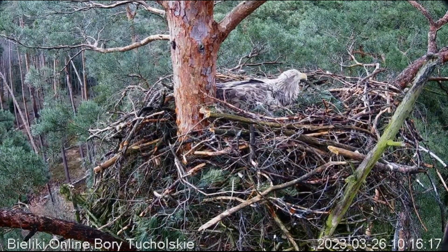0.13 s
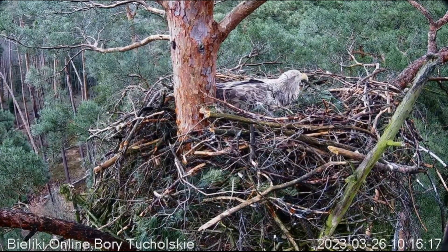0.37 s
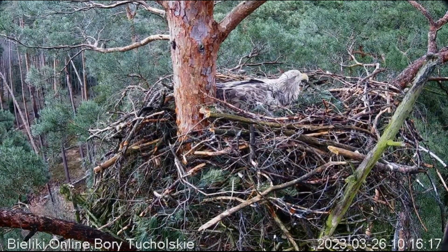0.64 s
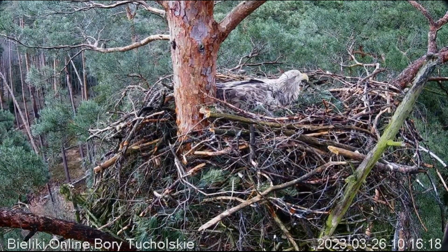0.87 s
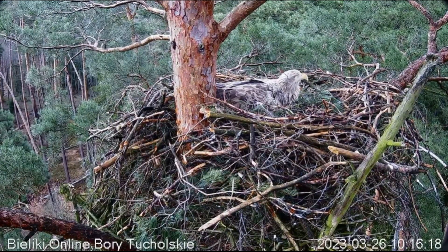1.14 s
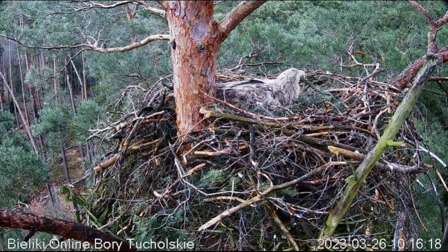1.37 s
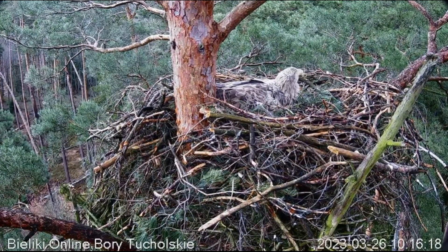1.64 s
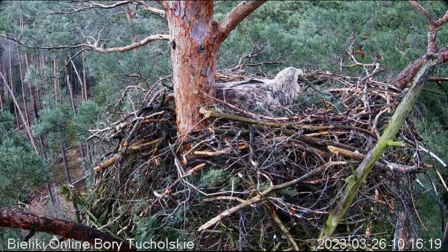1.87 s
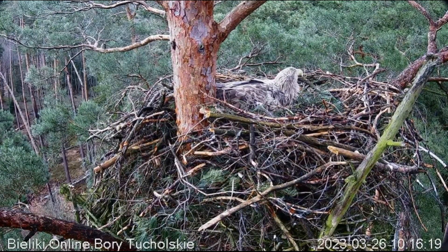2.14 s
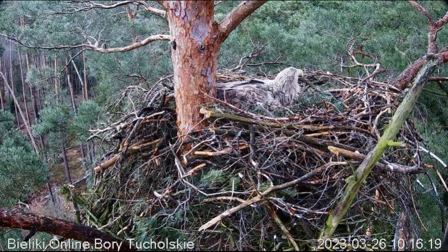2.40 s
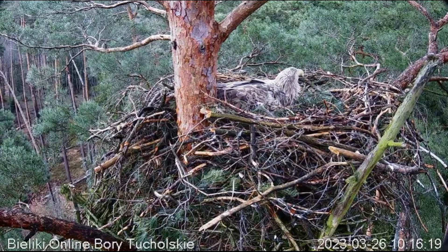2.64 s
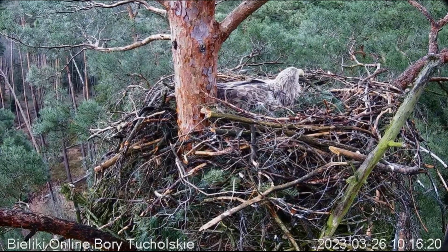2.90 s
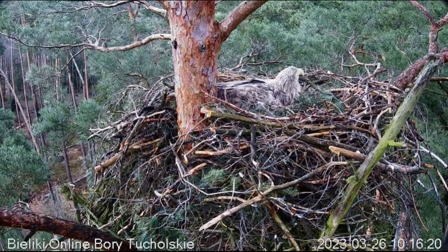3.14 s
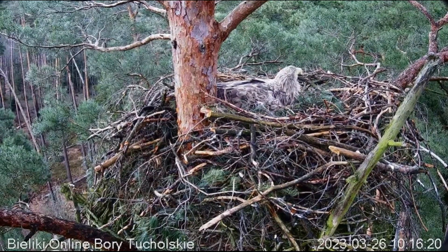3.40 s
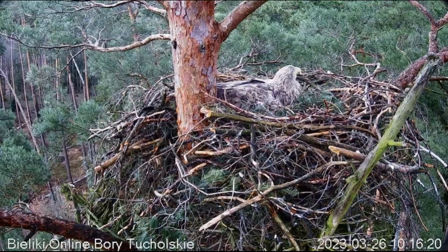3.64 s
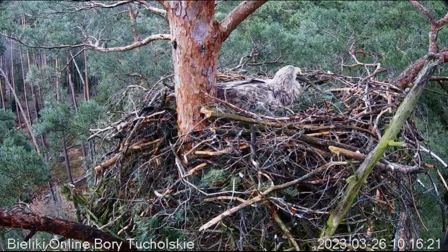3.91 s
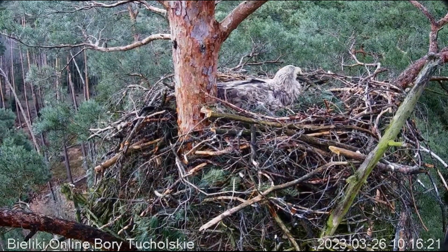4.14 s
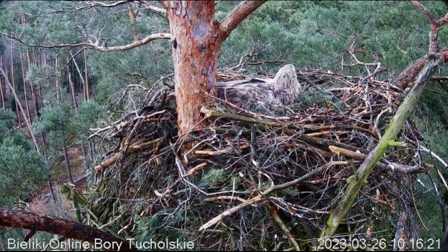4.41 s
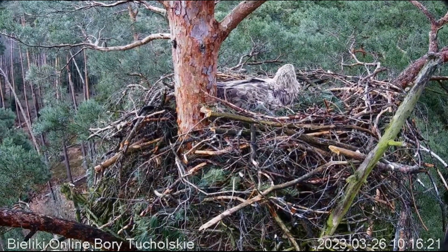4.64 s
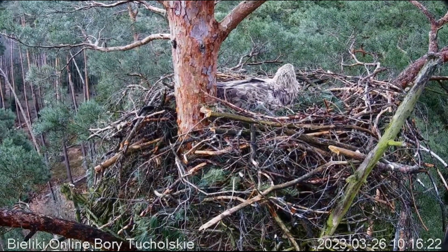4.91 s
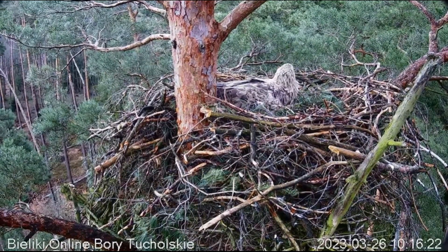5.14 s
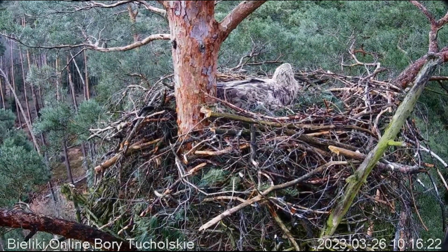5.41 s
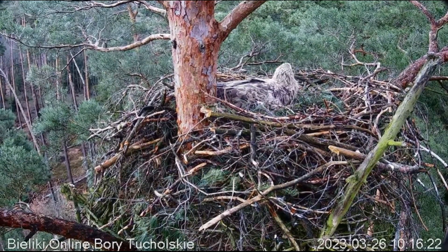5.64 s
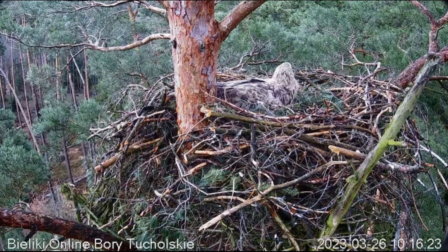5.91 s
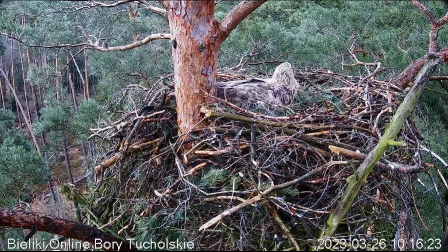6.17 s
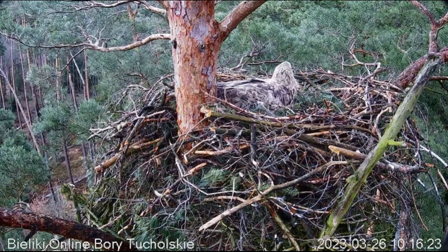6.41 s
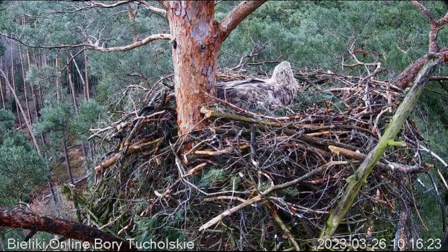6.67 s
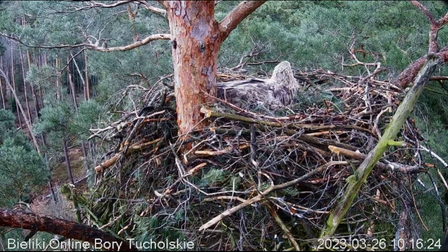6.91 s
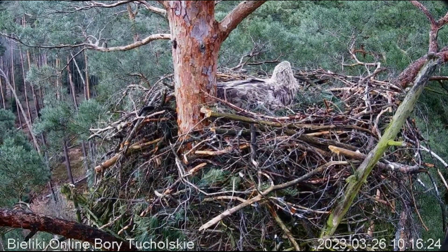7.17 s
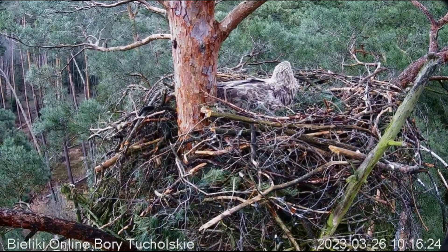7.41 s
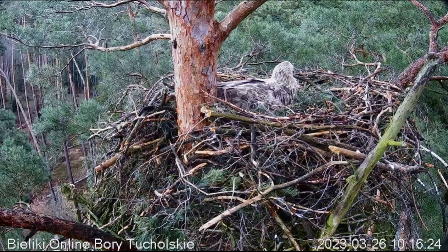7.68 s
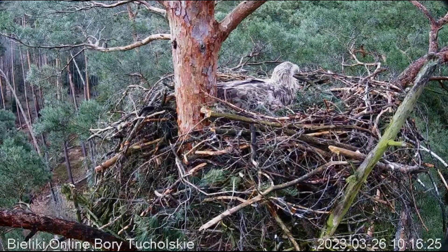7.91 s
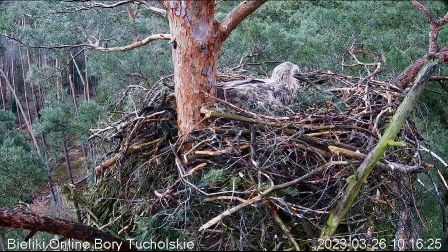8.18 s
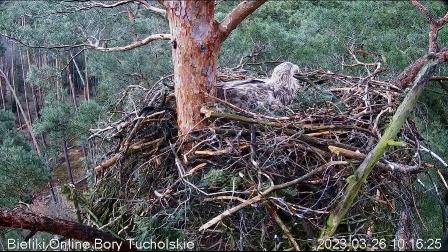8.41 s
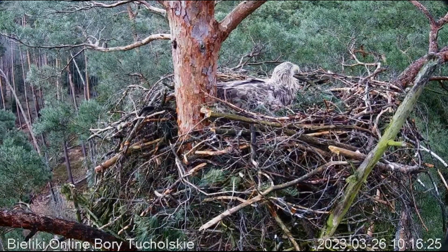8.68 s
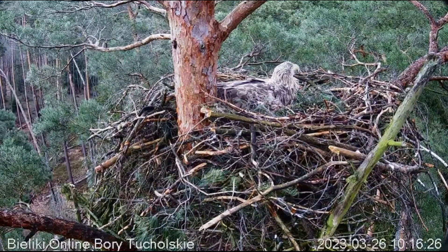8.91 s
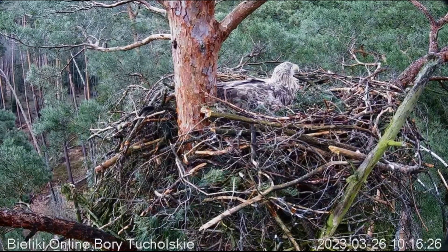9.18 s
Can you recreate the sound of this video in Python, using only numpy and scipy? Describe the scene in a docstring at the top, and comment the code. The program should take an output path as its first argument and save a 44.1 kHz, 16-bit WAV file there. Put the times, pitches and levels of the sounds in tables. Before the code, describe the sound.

A finch's falling phrases, a fluting thrush and a two-note tit ring through pines, with low wind buffeting early on.

```python
"""Songbirds in a pine forest at a small microphone high in a tree: a thrush flutes, a finch sings falling
phrases, a tit repeats two notes, thin seeps and pips come from further off. All are wavering, fluttering sines
on pitch tracks, echoed from the trunks by convolution with sparse noise. Wind gusts thump (one-cycle pulses)
and rumble (shaped noise) on the microphone, twigs crackle, the forest hums softly as flickering noise
and the electronics tick in the treble as short noise bursts."""
import sys
import numpy as np
from scipy import signal
from scipy.fft import rfft, irfft
from scipy.io import wavfile
from scipy.ndimage import uniform_filter1d

SR = 44100
rng = np.random.default_rng(int(sys.argv[2]) if len(sys.argv) > 2 else 0)


def log_audio(samples):
    """Write samples as a 16-bit WAV file to the path given in sys.argv[1]."""
    # one column per channel
    frames = np.atleast_2d(samples).T
    # limit to full scale, then quantise
    limited = np.clip(frames, -1, 1)
    pcm = np.round(limited * 32767).astype(np.int16)
    wavfile.write(sys.argv[1], SR, pcm)


def invert_db(level):
    """Linear amplitude ratio for a level in decibels (20 dB per decade), elementwise."""
    return 10 ** (np.asarray(level, dtype=float) / 20)


N = 410130
TIME = np.arange(N) / SR


def band(x, lo_hz, hi_hz):
    """Butterworth band-pass."""
    return signal.sosfilt(signal.butter(2, [lo_hz, hi_hz], "band", fs=SR, output="sos"), x)


def unit(x):
    """Scales to rms 1."""
    return x / np.sqrt(np.mean(x ** 2))


def coloured(points):
    """Noise with the given (Hz, relative dB) spectrum, rms 1."""
    hz, db = np.transpose(points)
    log_hz = np.log(np.fft.rfftfreq(N, 1 / SR) + 1)
    gain = invert_db(np.interp(log_hz, np.log(hz), db))
    return unit(irfft(rfft(rng.standard_normal(N)) * gain, N))


def walk(rate_hz):
    """Random levels held 1 / rate_hz s and slewed twice; spread near 1."""
    hold = int(SR / rate_hz)
    steps = np.repeat(rng.standard_normal(N // hold + 1), hold)
    return unit(uniform_filter1d(uniform_filter1d(steps, hold), hold)[:N])


def add(out, start_s, sound):
    """Mixes a sound into out; a start before 0 becomes 0."""
    i = max(int(start_s * SR), 0)
    out[i:i + len(sound)] += sound[:N - i]


def span(length_s):
    """Progress 0-1 through a note."""
    return np.linspace(0, 1, int(length_s * SR))


def glide(length_s, first_hz, last_hz, bend=1):
    """Pitch track from first to last; the larger the bend, the later it moves."""
    return first_hz + (last_hz - first_hz) * span(length_s) ** bend


def ticks():
    """Electronics: soft noise bursts every 20 ms that slide upward in pitch, in a pattern of five."""
    # Each entry: level of one tick in dB over the swell curve, before random spread.
    tick_db = [3, 12, 12, 5.5, 12]
    start_s, step_s, length_s = .0035, .02, .0135
    first_hz, last_hz = 5900, 6800
    slot, t = np.divmod(TIME - start_s, step_s)
    slot = slot.astype(int)
    u = t / length_s
    size, shift = rng.standard_normal((slot.max() + 2, 2))[slot].T
    gate = np.sin(np.pi * np.clip(u, 0, 1) ** .6)
    hz = first_hz + (last_hz - first_hz) * u + 120 * shift
    fuzz = unit(band(band(rng.standard_normal(N), 20, 450), 20, 450))
    pattern_db = np.array(tick_db)[slot % len(tick_db)] + 1.8 * size
    return invert_db(pattern_db) * gate * fuzz * np.sin(2 * np.pi * np.cumsum(hz) / SR)


def background():
    """Far wind in the crowns and microphone hiss, each third-octave band flickering alone, plus ticks."""
    # Common swell. Each row: time in seconds, level in dB.
    swell = [(0, -85.5), (3.1, -84.5), (4.4, -85.5), (5.02, -89.5), (5.96, -86), (8.18, -89), (8.29, -86.5),
             (9.3, -85.5)]
    # Forest spectrum. Each row: frequency in Hz, relative density in dB per Hz.
    forest = [(32, -25), (55, -10), (80, -10), (201, -9.5), (493, -3), (596, -1.5), (737, 1.5),
              (1050, -11.5), (1430, -17), (4750, -22.5), (5470, -21.5), (6150, -15.5), (7610, -19.5),
              (12800, -26), (14400, -27.5), (15400, -51)]
    air_db = 16  # over the swell
    spectrum = rfft(coloured(forest))
    octave = np.log2(np.fft.rfftfreq(N, 1 / SR) + 1)
    together_db = .5 * walk(35)  # shared by all bands
    air = 0
    for centre in np.arange(5, 15, 1 / 3):
        share = np.clip(1 - 3 * np.abs(octave - centre), 0, 1)
        flicker_db = together_db + 1.4 * walk(25) + 2.3 * walk(60)
        air = air + irfft(spectrum * share, N) * invert_db(flicker_db)
    swell_db = np.interp(TIME, *np.transpose(swell))
    return invert_db(swell_db) * (invert_db(air_db) * air + ticks())


def wind():
    """Eddies push the membrane: one-cycle thumps, each with a burst of flapping, over lumpy turbulence."""
    # Strongest eddies. Each row: time in seconds, frequency in Hz, peak in dB.
    thumps = [(.033, 82, -43), (0.168, 78, -39), (0.218, 130, -36), (0.238, 200, -33.5), (0.677, 33, -38),
              (.762, 70, -36), (.82, 40, -41), (.953, 110, -37), (1.185, 40, -44), (1.263, 23, -40.5),
              (1.337, 43, -41.5), (1.382, 60, -40.5), (1.822, 22, -34.5), (1.893, 37, -36),
              (1.911, 48, -30.5), (2.058, 42, -39), (2.209, 33, -41.5), (2.482, 22.6, -36), (2.59, 21, -37),
              (2.663, 34, -36.5), (2.849, 65, -48), (2.905, 55, -45.5), (2.966, 45, -38), (3.0, 52, -32),
              (3.067, 18, -35), (3.116, 15.4, -25.5), (3.191, 24, -38.5), (3.326, 41, -32.5),
              (3.373, 28, -36.5), (3.591, 30, -31), (3.628, 19, -25.5), (3.675, 23, -30.5),
              (3.714, 116, -27.5), (3.746, 66, -30.5), (3.809, 21, -36), (3.867, 49, -35),
              (3.938, 113, -24.5), (3.952, 120, -33.5), (3.991, 109, -27.5), (4.019, 76, -34),
              (4.063, 66, -29.5), (4.083, 98, -29.5), (4.113, 46, -34.5), (4.179, 88, -25.5),
              (4.191, 83, -21.5), (4.25, 102, -27), (4.268, 85, -35.5), (4.295, 87, -35), (4.324, 82, -32),
              (4.507, 77, -35)]
    # Turbulence. Each row: time in seconds, rumble level in dB, brightness (sets the flapping) in dB.
    gust = [(0, -53.5, -16.5), (.23, -46.5, 0.5), (.39, -58.5, -0.5), (1.6, -51.5, -8.5), (2.2, -56.5, -15),
            (2.72, -60.5, -9.5), (3.03, -55.5, -10), (3.55, -57.5, -10.5), (3.96, -57, -4.5),
            (4.25, -49.5, 1), (4.45, -49.5, -13.5), (4.74, -66.5, -12), (5.7, -67.5, -6.5),
            (6.7, -72, -10.5), (7.0, -76, -12), (7.9, -78, -4), (8.3, -64, -12), (8.6, -73, -8),
            (9.3, -65.5, -11)]
    # Rumble spectrum. Each row: frequency in Hz, relative density in dB per Hz.
    rumble = [(10, -10), (24, 6.5), (45, -5.5), (70, -10), (120, -27), (200, -58), (600, -130)]
    # Flapping spectrum. Each row: frequency in Hz, relative density in dB per Hz.
    flap = [(50, -16.5), (90, -3.5), (150, -9), (225, -10), (320, -19), (450, -29), (700, -42), (1500, -52),
            (3000, -90)]
    eddy_lo_hz, eddy_hi_hz, eddy_db = 30, 70, 3  # chance eddies; dB over the turbulence
    swing, one_way, one_way_hz = 3.2, 10, 56.7  # bunching of quick and slow eddies, top of the slow range
    s, gust_db, bright_db = np.transpose(gust)
    gust_db, bright_db = np.interp(TIME, s, gust_db), np.interp(TIME, s, bright_db)
    lumps = walk(20)
    out = invert_db(gust_db + 2.2 * lumps) * coloured(rumble)
    bursts = np.zeros(N)

    starts = rng.integers(SR // 10, N, size=60)
    eddies = []
    for i, (b, c) in zip(starts, rng.random(size=(60, 2))):
        hz = eddy_lo_hz + (eddy_hi_hz - eddy_lo_hz) * b
        eddies.append((TIME[i], hz, gust_db[i] + eddy_db + 6 * (c - .5)))
    pushes = thumps + eddies
    phases = np.pi * rng.integers(0, 2, len(pushes))  # push or pull
    for (at_s, hz, db), phase in zip(pushes, phases):
        cycles = np.arange(-3, 3, hz / SR)
        start_s = at_s - 3 / hz
        # slow eddies push or pull one way only; quick ones swing back
        narrow = swing + (one_way - swing) * np.clip(2 - hz / one_way_hz, 0, 1)
        add(out, start_s, invert_db(db) * np.exp(-narrow * cycles ** 2) * np.cos(2 * np.pi * cycles + phase))
        # quick eddies flap harder than slow ones
        add(bursts, start_s, invert_db(db - 18.0) * (hz / 100) ** 0.99 * np.exp(-1.2 * cycles ** 2))
    steady = invert_db(gust_db + bright_db - 8.5 + 3.6 * lumps + 4.0 * walk(60))
    out += (bursts + steady) * coloured(flap)
    return signal.sosfilt(signal.butter(1, 8, "high", fs=SR, output="sos"), out)


def crackles():
    """Faint dry crackles in the twigs: each a short decaying cluster of tiny clicks."""
    # Each row: start in seconds, level in dB before band-pass.
    twig_cracks = [(.422, -70), (1.906, -68), (2.449, -72), (2.918, -53), (2.94, -58), (8.095, -70)]
    out, t = np.zeros(N), TIME[:SR // 20]
    for at_s, db in twig_cracks:
        clicks = rng.standard_normal(len(t)) * rng.random(len(t)) ** 3
        add(out, at_s, invert_db(db) * clicks * np.exp(-t / .012))
    return band(out, 1300, 8000)


def trunks(x, t60_s, db, slap_db, near_db, facing_db=0):
    """Echoes from many separate trunks, and a blurred slap from the far edge of the stand."""
    t = TIME[:SR]
    returns = rng.standard_normal(SR) * (rng.random(SR) < .05)
    tail = returns * np.exp(-np.log(1000) * t / t60_s) * (t > .008)
    slap = returns * np.exp(-((t - .105) / 0.013) ** 2)
    # needles close to the bird scatter the first milliseconds
    near = returns * (t > .002) * np.exp(-t / 0.009)
    echoes = np.zeros(SR)
    for part, part_db in ((tail, db), (slap, slap_db), (near, near_db)):
        echoes += invert_db(part_db) * part / np.sqrt(np.sum(part ** 2))
    # moving branches make the echoes come and go
    branches = invert_db(3.8 * walk(30) + 2.5 * walk(120))
    return x + branches * signal.fftconvolve(invert_db(facing_db) * x, echoes)[:N]


def whistle(hz, waver_hz, flutter_db, chance, start_s):
    """A near sine whose pitch wavers and whose level flutters, as leaves and air scatter it."""
    i = min(int(start_s * SR), N - len(hz))
    waver, flutter = (w[i:i + len(hz)] for w in chance)
    return invert_db(flutter_db * flutter) * np.sin(2 * np.pi * np.cumsum(hz + waver_hz * waver) / SR)


def small_bird(notes, edge, waver_hz, flutter_db, fall_db=0, late=1):
    """Soft-edged (start s, pitch track Hz, dB) notes; fall_db per kHz of fall; late over 1 delays the peak."""
    out, chance = np.zeros(N), (walk(250), walk(75))
    for start_s, hz, db in notes:
        arch = np.abs(np.sin(np.pi * np.linspace(0, 1, len(hz)) ** late)) ** edge
        shape = arch * invert_db(fall_db * (hz - hz.max()) / 1000)
        add(out, start_s, invert_db(db) * shape * whistle(hz, waver_hz, flutter_db, chance, start_s))
    return out


def far_birds():
    """Seeps, even pips and a faint random scatter of twitters too distant to tell apart."""
    # Thin high seeps. Each row: start in seconds, length in seconds, first Hz, last Hz, peak in dB.
    seep_rows = [(0.016, 0.064, 7500, 7340, -72), (0.317, 0.072, 7650, 7330, -81),
                 (0.076, 0.11, 6900, 7180, -72), (0.44, 0.015, 7890, 7840, -69),
                 (.709, 0.025, 8100, 8300, -70), (1.413, 0.039, 7660, 7600, -71),
                 (1.5, 0.034, 7640, 6802, -71), (1.569, 0.065, 7630, 7600, -67),
                 (1.708, 0.049, 7680, 7720, -65), (1.784, 0.053, 7740, 7470, -70),
                 (1.823, 0.097, 7860, 7900, -72), (1.93, 0.045, 7400, 7390, -66),
                 (2.05, .024, 7250, 7100, -66.5), (2.607, 0.015, 7300, 7320, -55),
                 (3.143, 0.048, 8270, 8170, -68.5), (3.144, 0.041, 7100, 6840, -66),
                 (3.263, 0.035, 7300, 6730, -67.5), (3.408, 0.046, 6740, 7100, -67.5),
                 (4.202, .06, 7190, 7330, -74), (4.368, 0.11, 7310, 7440, -59),
                 (4.55, .05, 7500, 7520, -72), (4.6, 0.057, 7530, 7640, -64),
                 (4.731, .028, 7970, 7800, -66.5), (4.754, .06, 7670, 7600, -67),
                 (4.9, .08, 7650, 7480, -79), (6.878, 0.014, 8040, 8070, -68),
                 (8.093, 0.023, 4680, 4610, -71.5), (8.443, 0.012, 7800, 7800, -65)]
    # Pips. Each row: start in seconds, peak in dB.
    pip_rows = [(1.865, -74), (2.24, -77), (3.013, -66), (7.02, -79), (7.365, -79), (7.75, -81),
                (8.13, -84), (8.485, -79)]
    pip_hz, pip_s = 4475, 0.079
    seeps = [(s, glide(d, a, b), db) for s, d, a, b, db in seep_rows]
    pips = [(s, glide(pip_s, pip_hz, pip_hz), db) for s, db in pip_rows]
    twitters = []
    for a, b, c, d, e in rng.random((260, 5)):
        slide = 1 + .12 * (c - .5) * span(0.006 + .012 * d)
        twitters.append((a * N / SR, (3200 + 5000 * b) * slide, -90 + 9 * e))
    high = small_bird(seeps + twitters, 0.46, waver_hz=58.6, flutter_db=5, late=1.2)
    return high + small_bird(pips, 0.45, waver_hz=13, flutter_db=2.5)


def tit():
    """The high note slides down onto its pitch, and a faint echo of it hangs on after it; the short low one
    sags a little."""
    # Each row: start in seconds, settled pitch in Hz, peak in dB, lingering level in dB,
    # lingering length in seconds, low note's peak in dB.
    calls = [(3.43, 4825, -54.5, -64, 0.11, -66), (3.808, 4813, -52.5, -65.5, 0.11, -57.5),
             (4.183, 4802, -54, -63, 0.17, -59.5), (4.563, 4757, -63, -82, .06, -64.5),
             (4.945, 4740, -61.5, -81, 0.049, -61), (5.327, 4737, -61.5, -74, 0.054, -63.5),
             (5.713, 4700, -53, -73, 0.05, -56.5), (6.103, 4700, -59.5, -80, 0.059, -63.5),
             (6.485, 4735, -60.5, -77, 0.027, -73)]
    high_s, low_s = .107, 0.043
    low_after_s, slowing, low_ratio = 0.1734, 0.0077, .826  # the gap grows by slowing s each second
    low_again_s = .105
    hoarse = dict(waver_hz=24, flutter_db=3)
    high, linger, low, again = [], [], [], []
    for s, hz, db, linger_db, linger_s, low_db in calls:
        high.append((s, hz + 400 * np.exp(-span(high_s) / 0.247), db))
        linger.append((s + 0.7 * high_s, glide(linger_s, hz, hz), linger_db))
        low_start_s = s + low_after_s + slowing * (s - calls[0][0])
        low_hz = low_ratio * hz + 40 * (.5 - span(low_s))
        low.append((low_start_s, low_hz, low_db))
        # the low note echoes back, as far below its peak as the high note's echo lies below its own
        again.append((low_start_s + low_again_s, low_hz, low_db + linger_db - db))
    return small_bird(high + low, 0.61, late=1.1, **hoarse) + small_bird(linger + again, 0.17, **hoarse)


def finch():
    """Four falling phrases, then single calls: hooked syllables and arched chips, with faint nearly level tones
    trailing among them."""
    # Each row: start in seconds, syllable name, peak in dB before fading with pitch.
    sung_rows = [(.259, "hook", -66), (.39, "slide", -67.5), (.559, "sweep", -60.5), (.586, "flick", -55.5),
                 (.975, "top", -69), (1.082, "top", -64), (1.201, "hook", -60), (1.322, "slide", -58),
                 (1.486, "sweep", -52.5), (1.513, "flick", -72), (1.9, "top", -54.5), (2.0, "top", -56.5),
                 (2.14, "hook", -50), (2.262, "slide", -54), (2.426, "sweep", -49.5), (2.464, "flick", -58),
                 (2.86, "top", -56.5), (2.958, "top", -52), (3.082, "hook", -45.5), (3.21, "slide", -49),
                 (3.389, "sweep", -41), (3.429, "flick", -60), (6.845, "call", -52.5), (8.432, "hook", -58),
                 (8.555, "droop", -58.5), (8.94, "hook", -62.5)]
    # Each entry by name: length in seconds, first Hz, last Hz, bend (larger hooks down later),
    # fading in dB per kHz of fall, hoarseness in Hz.
    syllables = {"top": (.083, 6480, 6300, 11.3, 10, 86), "hook": (0.059, 6060, 4750, 10, 4, 30),
                 "slide": (0.036, 5790, 4350, 4, 0.9, 30), "sweep": (.036, 5430, 4180, 2.3, 1.2, 16),
                 "flick": (0.013, 5178, 4088, 1.04, 2.2, 27), "call": (0.052, 6170, 5700, 5.4, 10, 39),
                 "droop": (0.029, 5780, 4650, 6.1, 7.3, 45)}
    # Faint nearly level tones among the syllables. Each row: start in seconds, length in seconds, first Hz,
    # last Hz, peak in dB.
    held_rows = [(1.294, 0.056, 5980, 6000, -71), (2.082, 0.14, 6610, 6380, -63),
                 (2.232, 0.082, 6060, 6010, -59), (2.341, 0.054, 5750, 5730, -61.5),
                 (3.03, 0.092, 6240, 6560, -64), (3.149, .039, 6120, 6110, -63),
                 (3.238, 0.035, 6130, 6030, -59), (3.255, 0.067, 5780, 5740, -66),
                 (3.331, 0.05, 5800, 5720, -63), (4.26, 0.093, 5880, 6040, -63),
                 (4.413, .048, 5970, 6100, -65), (6.828, 0.02, 5770, 6350, -66),
                 (8.33, 0.068, 6410, 5980, -54.5), (8.394, 0.017, 6200, 6300, -68)]
    # Closing chips. Each row: start in seconds, length in seconds, top Hz, peak in dB.
    chip_rows = [(0.633, .035, 3920, -73), (0.698, .02, 3850, -74), (0.762, 0.021, 3740, -75),
                 (0.85, 0.027, 3530, -70.5), (1.56, 0.023, 4080, -69), (1.62, 0.019, 3890, -63),
                 (1.785, 0.014, 3580, -70), (2.507, 0.024, 3960, -61.5), (2.56, .035, 3830, -69.5),
                 (2.588, 0.052, 4670, -66), (2.638, 0.039, 3520, -70), (2.72, 0.033, 3550, -69),
                 (2.795, .021, 3570, -68.5), (3.477, 0.016, 3970, -57), (3.529, .022, 3920, -63),
                 (3.619, 0.033, 3600, -65)]
    held = [(s, glide(d, a, b), db) for s, d, a, b, db in held_rows]
    chips = [(s, top * (1 - .12 * (2 * span(d) - .9) ** 2), db) for s, d, top, db in chip_rows]
    out = small_bird(held + chips, 0.69, waver_hz=45, flutter_db=2.5, fall_db=2.0)
    for name, (*track, fall_db, waver_hz) in syllables.items():
        notes = [(s, glide(*track), db) for s, sung, db in sung_rows if sung == name]
        out += small_bird(notes, 0.52, waver_hz, 4.4, fall_db, late=1.36)
    return out


def thrush():
    """Fluted glides, slightly hoarse; some trill quickly by pitch modulation."""
    # Each row: start in seconds, shape name, length in seconds, pitch in Hz, level in dB rms
    # before the shape, trill in Hz either side.
    thrush_notes = [(1.371, "dip", 0.24, 2344, -48, 5.5), (1.627, "flick", 0.042, 2816, -51, 5),
                    (1.628, "even", 0.14, 2494, -61, 11), (1.75, "even", 0.14, 2524, -51, 87),
                    (1.951, "rise", 0.21, 2300, -54.5, 90), (2.19, "even", 0.1, 2540, -71, 56),
                    (2.222, "arch", 0.32, 2692, -68.5, 13), (5.73, "even", 0.23, 2657, -50, 4.4),
                    (5.973, "bow", 0.028, 2346, -68, 5), (6.001, "even", 0.031, 2326, -53.5, 22),
                    (6.093, "fall", 0.065, 2880, -62.5, 21), (6.173, "even", 0.043, 2300, -56, 4.9),
                    (6.221, "step", 0.086, 2926, -57, 10), (6.442, "climb", 0.0796, 2126, -64, 20),
                    (6.537, "fade", 0.22, 2390, -71, 5), (6.662, "bow", 0.036, 3176, -78, 5),
                    (8.251, "dip", 0.23, 2249, -55, 10), (8.509, "flick", 0.036, 2770, -50, 4.3),
                    (8.649, "even", 0.085, 2560, -64.5, 58), (8.839, "climb", 0.21, 2412, -53, 61),
                    (9.108, "arch", 0.27, 2706, -65, 5)]
    # Each entry by name, rows of: progress 0-1, ratio to the note's pitch, level in dB.
    shapes = {"dip": [(0, 1.243, -20), (.13, 1.13, -11), (.25, 1.155, -5.5), (.37, 1, -6.5), (.58, 1, -4),
              (.85, 1.08, 0), (1, 1.115, -2.5)], "rise": [(0, .86, -22), (.12, .9, -18), (.24, 1.0, -1),
              (.45, 1.07, -2.5), (.8, 1.1, -5), (1, 1.1, -10.5)], "flick": [(0, 1.16, -18.5), (.55, 1, 1.5),
              (.75, 1, -14.5), (1, 0.9, -8)], "climb": [(0, .94, -17), (.2, .985, -7), (.55, 1.09, -0.5),
              (.8, 1.135, 0), (1, 1, -17)], "fade": [(0, 0.98, -12), (.15, 0.98, 2), (.5, 1, -11),
              (1, 0.96, -20)], "fall": [(0, 1.0, -6), (.45, 0.96, 4), (1, .83, -6)], "arch": [(0, 0.82, -9),
              (.08, 1.05, -3), (.115, 1.2, -4), (.33, 1.015, 0.5), (.5, 1, -0.5), (.62, 1, -11),
              (.68, 1, -4), (.85, 1, -10), (.9, 1, -24), (.96, 1, 4), (1, 0.99, -12)],
              "step": [(0, 0.68, -20), (.25, 1, 1.5), (.4, 1.012, 2.5), (.8, 1, -3), (1, .965, -4)],
              "bow": [(0, 0.97, 0), (.3, 0.92, -2), (1, .9, -4)], "even": [(0, .93, -21), (.17, .99, -5),
              (.7, 1.01, 0), (1, 1, -21)]}
    trill_rate_hz, edge_s = 62, 0.0053
    waver_hz, flutter_db = 17, 3.2
    out, chance = np.zeros(N), (walk(220), walk(50))
    for start_s, shape, length_s, hz, db, trill_hz in thrush_notes:
        at, ratio, shape_db = np.transpose(shapes[shape])
        u = span(length_s)
        fade = np.clip(np.minimum(u, 1 - u) * length_s / edge_s, 0, 1)
        trill = np.sin(2 * np.pi * trill_rate_hz * u * length_s + 1.5 * chance[1][:len(u)])
        track = hz * np.interp(u, at, ratio) + trill_hz * trill
        level = np.sqrt(2) * invert_db(db + np.interp(u, at, shape_db))
        add(out, start_s, level * fade * whistle(track, waver_hz, flutter_db, chance, start_s))
    return out


def scene():
    """All sources at one microphone; only the birds are echoed."""
    # The thrush turns from the trunks for its middle phrase, so less comes back.
    # Each row: time in seconds, echo change in dB.
    thrush_facing = [(3, 0), (5.9, -4), (6.1, -9), (7, -9), (8, 0)]
    facing_db = np.interp(TIME, *np.transpose(thrush_facing))
    birds = trunks(finch(), t60_s=0.57, db=-15, slap_db=-22, near_db=-8.5)
    birds += trunks(tit(), t60_s=0.68, db=-14, slap_db=-20.5, near_db=-7)
    birds += trunks(far_birds(), t60_s=0.52, db=-10.0, slap_db=-27, near_db=-9)
    birds += trunks(thrush(), t60_s=0.56, db=-10, slap_db=-29, near_db=-6, facing_db=facing_db)
    return (birds + wind() + crackles() + background())[None]


def band_limit(x):
    """A steep low-pass at the top of the band."""
    return signal.sosfilt(signal.butter(12, 15590, fs=SR, output="sos"), x)


def record(dry):
    """Passes the finished mix on to the output."""
    return band_limit(dry)


dry = scene()
out = record(dry)
log_audio(out)
```